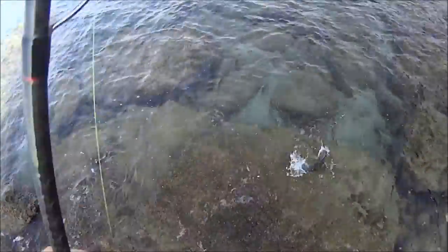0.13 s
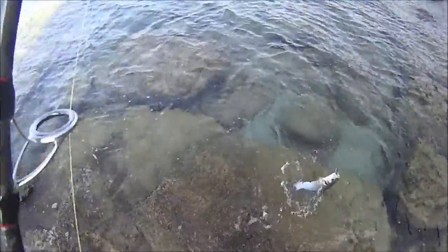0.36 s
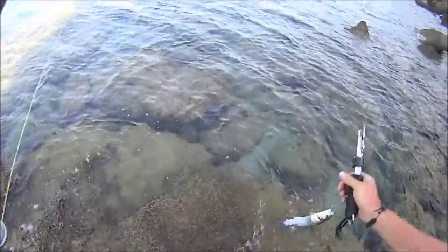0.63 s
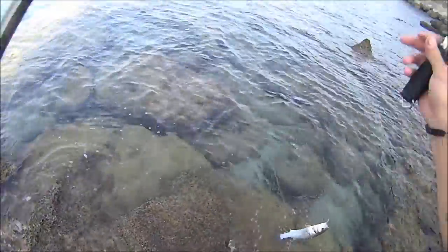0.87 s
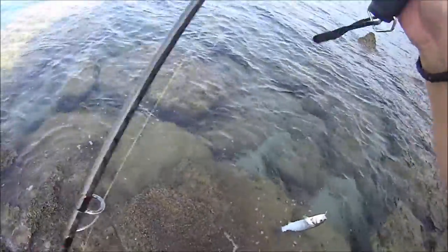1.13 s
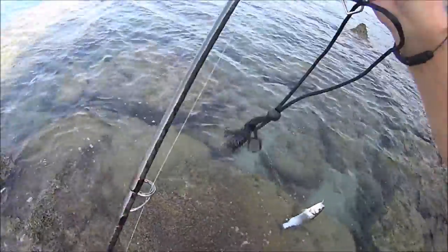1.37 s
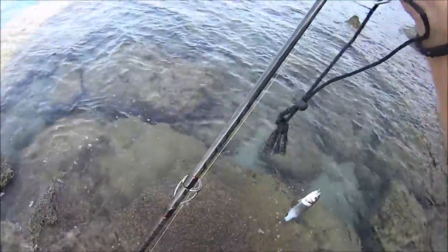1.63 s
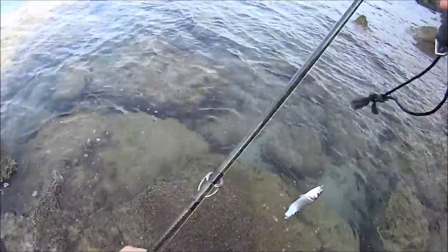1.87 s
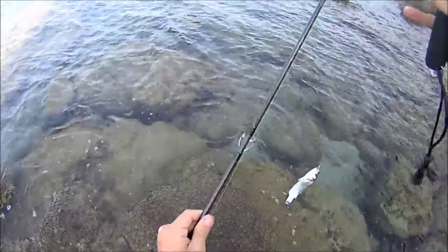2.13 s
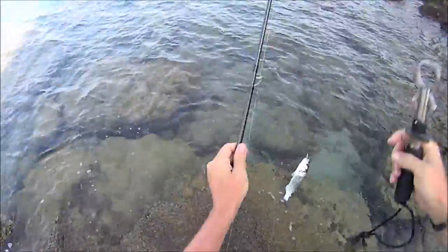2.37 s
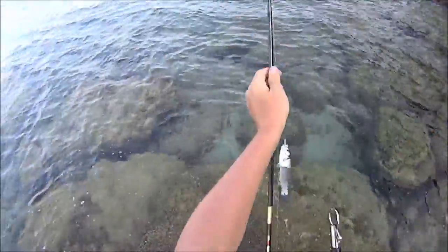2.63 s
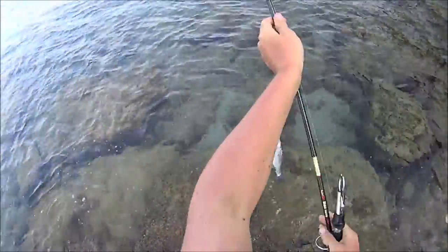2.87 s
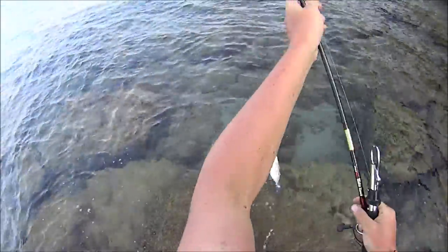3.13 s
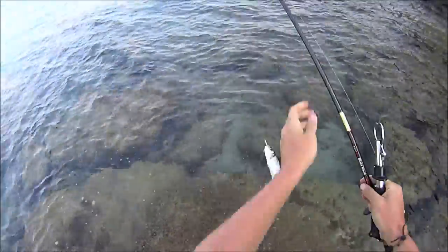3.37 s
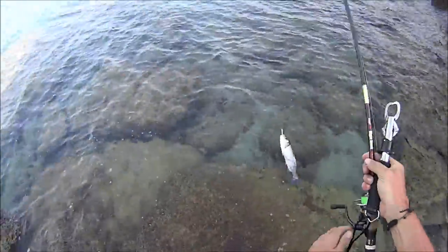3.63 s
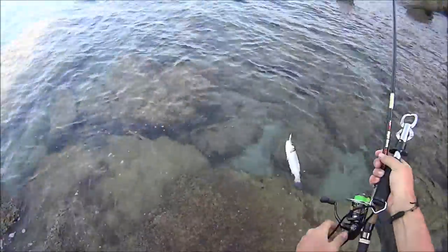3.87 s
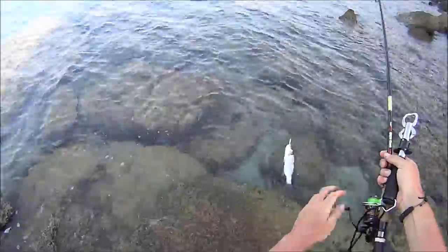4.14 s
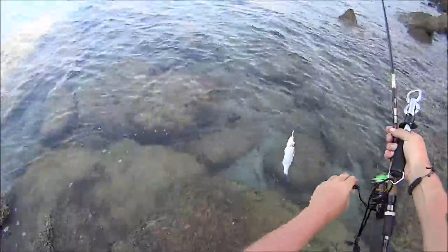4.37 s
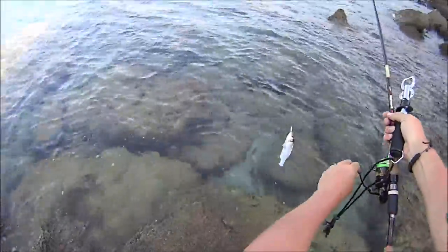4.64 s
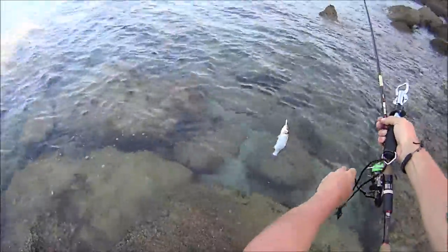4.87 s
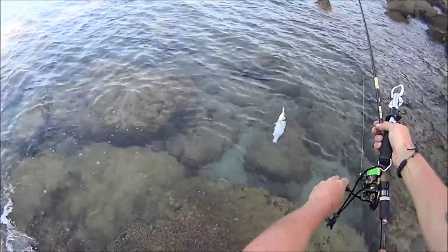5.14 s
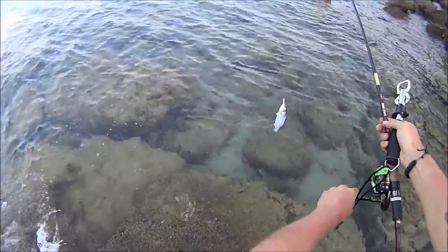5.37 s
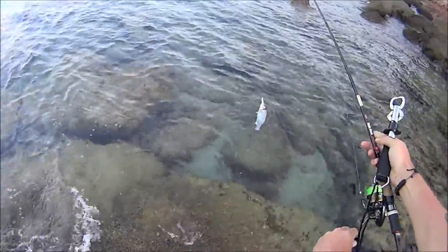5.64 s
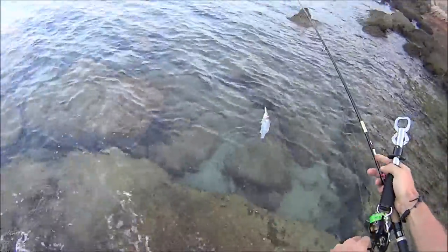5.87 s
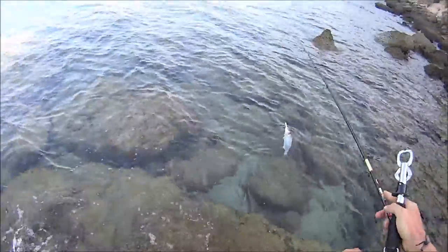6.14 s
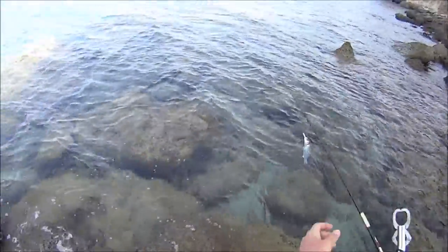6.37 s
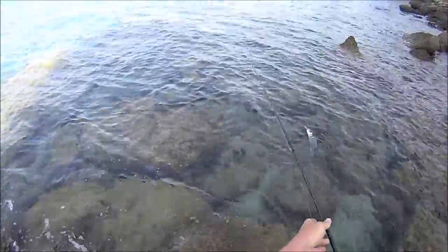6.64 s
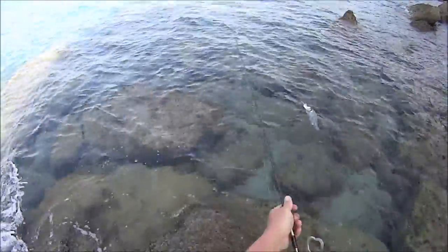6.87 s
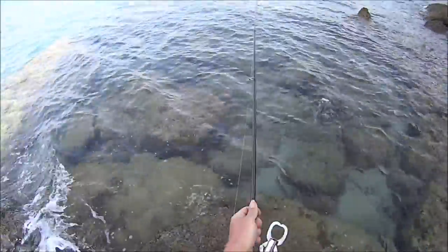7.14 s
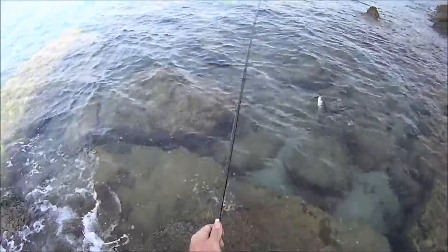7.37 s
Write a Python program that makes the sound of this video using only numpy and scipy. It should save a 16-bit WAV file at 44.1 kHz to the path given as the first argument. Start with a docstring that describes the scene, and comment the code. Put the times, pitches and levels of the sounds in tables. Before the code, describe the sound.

Small waves wash over shallow rocks close to a microphone inside a housing, giving the water a resonant, boxy colour. Quick splashes from a fish and sharp droplet ticks come first, then the water quiets. Later the foam swells with a cluster of slaps, eases, and rises to a broad splash near the end. A faint low breeze rumbles underneath.

```python
"""Small waves over shallow rocks

Close by, a foamy wash swells and ebbs: banded noise that follows a surge table, through a ringing housing.
Droplets tick and bubbles plink in it as short decaying tones; a fish and the waves throw short splashes,
sudden wide bursts of noise. Behind them a light breeze, low-passed noise, rumbles at the two microphone ports."""
import sys
import numpy as np
from scipy import signal
from scipy.fft import irfft
from scipy.io import wavfile
from scipy.ndimage import uniform_filter1d

SR = 44100
rng = np.random.default_rng(int(sys.argv[2]) if len(sys.argv) > 2 else 0)


def magnitude_from_level(level_db):
    """Linear magnitude for a level in decibels (20 dB per decade)."""
    exponent = np.asarray(level_db, float) / 20
    return 10 ** exponent


def pcm_store(signal):
    """Save signal as 16-bit PCM."""
    levels = np.round(np.clip(np.atleast_2d(signal), -1, 1) * 32767)
    wavfile.write(sys.argv[1], SR, levels.astype(np.int16).T)


N = 331191  # samples
PORT_DELAY = 256  # samples, delay built into the port responses and cut off after filtering
HOP = 64  # samples between frames of the wash

# swell and ebb of the water ahead of the housing: t/s, level/dB, treble/dB, bass/dB,
# band near 2.8 kHz/dB, band near 1.4 kHz/dB, left-right/dB
SURGE = [(0, -41.5, 0.5, 10.5, -2, 8, -0.5), (.21, -39.5, -1.5, 5.5, -7.5, 2, -1.5),
         (.65, -43.5, -0.5, 6, -2.5, 4.5, -1), (1.05, -40.5, -5.5, 6.5, -1.5, 1.5, -0.5),
         (1.57, -40.5, -0.5, 11, 3, 3.5, 0), (1.75, -41.5, -2.5, 9, 4.5, 6.5, -0.5),
         (1.96, -45, -4.5, 8.5, 2, 5.5, -0.5), (2.35, -45.5, -2.5, 8.5, -5, 5.5, -0.5),
         (2.7, -48.5, -2.5, 9.5, -3.5, 8, -0.5), (2.9, -45, -4, 8, 2.5, 3, -0.5),
         (3.15, -45.5, -2, 11, -7, 5, -0.5), (3.45, -39.5, -3.5, 5, -4, 3.5, -3),
         (3.75, -34.5, -4, 8.5, 1.5, -1.5, -0.5), (4.15, -38, -2, 7.5, 0, 3, .5),
         (4.6, -35.5, -5.5, 4, 0, -1.5, -1), (5.1, -33, -3, 8, -6.5, -7, 0),
         (5.4, -30.5, 0, 2.5, -1, -6, -0.5), (5.7, -33, -2.5, 7, -1.5, -2, -0.5),
         (6.07, -37.5, 0, 3.5, -1.5, 2, -0.5), (6.28, -38.5, -4, 5, -2, 6, -0.5),
         (6.6, -34, -0.5, 3.5, -0.5, -5, .5), (6.78, -36.5, -3, 6.5, -2, 2, -.5),
         (7, -31.5, -1.5, 3, -3, -5, -0.5), (7.25, -33, 0, 4, -3, 1, -1), (7.4, -35, 1, 7, -12, 4, -1.5),
         (7.51, -36, 0, 7, -1, 2, 0)]


def wash(patchy_db, flicker_db):
    """Foam and sliding water: noise in drifting patches, with slaps as sudden wide bursts."""
    # left-right likeness of the wash: f/Hz, likeness/1
    likeness = [(70, 0.91), (200, 0.59), (550, 0.42), (1090, 0.76), (1400, 0.95), (1900, 0.33),
                (2300, 0.88), (4600, 0.81), (6700, 0.74), (11000, 0.51)]
    wander_s, hollow_wander_db, treble_wander_db = 0.043, 2, 2  # averaging time, rms swings
    frames, hz = N // HOP + 5, np.fft.rfftfreq(256, 1 / SR)
    left_re, left_im, other_re, other_im, patches = rng.standard_normal((frames, 129, 5)).T
    patches = uniform_filter1d(uniform_filter1d(patches, 4, axis=0), 24, axis=1)
    patches = evened(patches)
    flicker = wander(frames, 12)
    t = np.arange(frames) * HOP / SR
    octaves = np.log2((hz[:, None] + 50) / 3500)

    s, *columns = np.transpose(SURGE)
    level_db, treble_db, bass_db, ring_db, hollow_db, pan_db = (np.interp(t, s, c) for c in columns)
    steps = wander_s * SR / HOP
    hollow_db = hollow_db + hollow_wander_db * wander(frames, steps)
    treble_db = treble_db + treble_wander_db * wander(frames, steps)
    shape_db = treble_db * np.clip(octaves - 0.3, 0, 1)
    shape_db += bass_db * np.clip(-0.9 * octaves - 1.3, 0, 1)
    shape_db += hollow_db * np.exp(-((octaves + 1.3) / 0.28) ** 2)
    shape_db += ring_db * np.exp(-((octaves + 0.3) / 0.22) ** 2)
    moving_db = patchy_db * patches + flicker_db * flicker * (octaves > -1)
    power = magnitude_from_level(2 * (level_db + shape_db + moving_db)) + slap_power(t, octaves)

    # the right port hears a frequency-dependent share of the left port's noise
    same = np.clip(read(likeness, hz), -1, 1)[:, None]
    left = left_re + 1j * left_im
    right = same * left + np.sqrt(1 - same ** 2) * (other_re + 1j * other_im)
    unit = np.std(signal.istft(left, nperseg=256, noverlap=192)[1])
    spectra = np.array([left, right]) * np.sqrt(power) * panned(pan_db)[:, None]
    return signal.istft(spectra, nperseg=256, noverlap=192)[1][:, :N] / unit


def slap_power(t, octaves):
    """Splashes of the fish and waves: power over band and time, a fast rise and exponential decay."""
    # slaps of water: t/s, level/dB, rise/s, decay t60/s, brightness/(dB per octave)
    slaps = [(.1, -29, .006, 0.1, 7), (.19, -38, .002, .12, 5), (0.364, -25, 0.0097, 0.11, 0),
             (.397, -41, 0.0022, 0.027, 1), (.72, -39, .003, .04, 3), (.54, -48, 0.011, 0.082, -4),
             (1.14, -28.5, .008, 0.07, 2), (1.28, -26.5, 0.0094, 0.11, -3), (1.39, -33, 0.0056, 0.12, 0),
             (1.5, -20.5, 0.015, 0.12, -3), (2.14, -34, 0.033, 0.3, -1), (2.771, -22.5, 0.0034, 0.042, 0),
             (2.828, -38.5, 0.002, 0.16, -3.5), (2.948, -26.5, 0.0043, 0.031, 0),
             (3.27, -40, 0.011, 0.17, -4.5), (3.66, -34, 0.033, 0.53, -5.5), (4.73, -39, 0.012, 0.14, -9),
             (4.937, -29, 0.0055, 0.27, 0), (5.15, -23.5, 0.012, 0.18, 2.5), (5.31, -26, 0.011, 0.11, 2),
             (5.44, -21.5, .01, 0.11, -3), (5.569, -16.5, 0.0063, 0.049, -1.5),
             (5.73, -20.5, 0.0078, .08, -1), (5.83, -33, .01, 0.075, 11), (6.11, -37, .01, 0.13, 10),
             (6.24, -29, .01, .06, -3.5), (6.598, -34.5, 0.015, 0.055, -10.5),
             (6.63, -25.5, .01, 0.088, 0.5), (6.839, -26, 0.011, 0.087, -6), (6.92, -26, .01, 0.11, 0),
             (7.27, -13.5, 0.052, 0.29, 0)]
    lumps_db = 1.8 * wander(len(t), 3)  # a slap breaks into spatters
    power = np.zeros((len(octaves), len(t)))
    for at, db, rise, t60, tilt_db in slaps:
        age = np.maximum(t - at, 0)
        slap_db = db + lumps_db + tilt_db * np.maximum(octaves, -3.5) - 60 * age / t60
        power += magnitude_from_level(2 * slap_db) * (1 - np.exp(-age / rise)) ** 2
    return power


def spray(per_s, spread_db, db, low_hz, high_hz, cycles, count):
    """Many droplets or bubbles: rising, decaying tones of mixed pitch that follow the surge; a few stand out."""
    clump_db, clump_s = 1.5, 0.03  # droplets come in clumps: rms swing, averaging time
    s, level_db = np.transpose(SURGE)[:2]
    size = magnitude_from_level(spread_db * np.minimum(rng.exponential(1, N), 4))
    size = size * (rng.random(N) < per_s / SR)
    kind, out = rng.integers(0, count, N), np.zeros((2, N))
    for k, hz in enumerate(np.geomspace(low_hz, high_hz, count)):
        ring = cycles * rng.uniform(0.75, 2.56)  # cycles to fall by a factor e
        turns = hz * np.arange(round(7 * ring / hz * SR)) / SR
        grain = np.sin(2 * np.pi * turns * (1 + 0.0497 * turns / ring)) * np.exp(-turns / ring)
        grain /= np.linalg.norm(grain)
        out += panned(rng.normal(0, 2.0))[:, None] * signal.oaconvolve(size * (kind == k), grain)[:N]
    clumps_db = clump_db * wander(N, clump_s * SR)
    surge_db = np.interp(np.arange(N) / SR, s, level_db)
    return magnitude_from_level(db + clumps_db + surge_db) * evened(out)


def near_ticks(response):
    """Droplets close to the ports: a short tone with spatter around its pitch, ringing the housing."""
    # the clearest droplet ticks: t/s, peak/dB, centre f/Hz, left-right/dB
    ticks = [(0.079, -22, 2800, -5), (.0845, -23, 2800, -5), (0.1056, -17, 2780, -5), (0.12, -19, 2860, -5),
             (0.128, -19.5, 5300, -1), (0.3823, -19, 7900, -6), (0.3984, -13.5, 3760, -3),
             (0.4713, -28, 4200, -3), (.5006, -25.5, 10500, -5), (0.5574, -17.5, 7900, -4),
             (.5696, -25, 7100, -3), (0.6527, -26.5, 2700, -2), (.7148, -27, 10300, -2),
             (0.7225, -21.5, 2670, -4), (.8511, -25.5, 2600, -1), (.9832, -30, 5200, -1),
             (1.1521, -24, 6160, -1), (1.162, -20.5, 2800, 3), (1.1976, -23.5, 5800, -1),
             (1.233, -30, 6600, 0), (1.2904, -22, 3000, 3), (1.397, -27, 3600, 2), (1.404, -25, 3200, 2),
             (1.4432, -28, 5300, -1), (1.521, -19, 2800, 1), (1.542, -23.5, 6350, 3),
             (1.6485, -23, 8640, -3), (1.6762, -23.5, 2820, 1), (1.7203, -21.5, 5250, -2),
             (1.7603, -24, 3180, 1), (1.8925, -33, 2800, 2), (1.9003, -28, 2900, 0), (1.9075, -29, 6600, 4),
             (2.45, -26, 8260, 2), (2.6675, -32, 6500, -3), (2.7737, -18, 5300, 0), (2.78, -21, 4200, 0),
             (2.7866, -28, 4330, 0), (2.7914, -24, 3000, 2), (2.829, -29, 4230, -3),
             (2.8317, -31, 9100, -2), (2.844, -28, 5000, -3), (2.865, -29, 8000, -2),
             (2.8783, -25, 4200, 0), (2.9071, -19.5, 3670, -3), (2.9148, -25, 6900, -3),
             (2.95, -28, 5570, -3), (2.9535, -23, 5200, -3), (2.9607, -32, 4000, 0),
             (2.9774, -31, 5700, -2), (3.031, -34, 8250, -7), (3.195, -28.5, 5300, -3),
             (3.473, -28, 10400, -3), (3.6282, -23, 6800, 1), (3.75, -26, 2800, 7), (4.393, -20.5, 4640, 8),
             (4.4734, -23, 6800, -1), (4.4796, -23, 2800, -1), (4.502, -17, 6450, -1),
             (4.883, -19, 5870, -3), (4.939, -17, 6960, 1), (5.0346, -20.5, 6600, -2),
             (5.1076, -26, 5440, -1), (4.554, -30, 5450, -1), (4.7416, -22, 3360, -10),
             (5.467, -9.5, 3300, 3), (5.6174, -16.5, 5170, 0), (5.626, -21, 8650, 0),
             (5.832, -21, 5800, -2), (5.9, -26, 5770, -1), (6.134, -21, 4200, -1), (6.3451, -22, 7300, -3),
             (6.5388, -20, 3160, -2), (6.581, -22.5, 8340, 10), (6.643, -18, 5300, 2),
             (6.736, -22, 5300, -2), (6.8556, -17, 3330, 0), (6.9345, -12, 2680, 3),
             (6.9773, -17.5, 5850, -3), (6.993, -20, 5730, -2), (7.1223, -19, 5300, -1),
             (7.2112, -17, 4500, -1), (7.274, -10, 5100, 1.5), (7.277, -16, 4520, 0),
             (7.4734, -18, 5700, 0)]
    tick_t60_s, spatter_t60_s, rise_s = 0.0061, 0.024, 0.00034
    spatter_width = 0.44  # bandwidth as a share of the pitch
    out, t = np.zeros((2, N)), np.arange(1500) / SR
    for s, peak_db, hz, pan_db in ticks:
        r = np.exp(-np.pi * spatter_width * hz / SR)
        resonator = [1, -2 * r * np.cos(2 * np.pi * hz / SR), r * r]
        spatter = evened(signal.lfilter([1, 0, -1], resonator, rng.standard_normal(len(t))))
        tick = np.sin(2 * np.pi * hz * t) + 0.69 * spatter
        tick *= magnitude_from_level(-60 * t / tick_t60_s) * np.minimum(t / rise_s, 1)
        tick[:2] += 0.29 * np.array([1, -1])  # the sharp first contact
        tick += 0.18 * spatter * magnitude_from_level(-60 * t / spatter_t60_s)  # fine spatter after it
        add_near(out, s, peak_db, pan_db, tick, response)
    return out


def large_bubbles(response):
    """Bubbles: decaying tones whose pitch rises as each nears the surface, ringing the housing."""
    # large bubbles: t/s, peak/dB, starting f/Hz, decay t60/s
    bubbles = [(.105, -43.5, 437, 0.024), (0.239, -48, 93, 0.066), (0.269, -51.5, 160, 0.17),
               (.412, -46, 880, 0.044), (2.35, -53, 160, 0.15), (2.764, -31.5, 1320, 0.024),
               (3.081, -35, 2230, 0.037), (3.09, -51, 288, 0.082), (3.21, -47.5, 275, 0.15),
               (3.34, -48.5, 246, 0.1), (3.46, -40, 2150, 0.13), (3.668, -42, 473, 0.092),
               (5.315, -46, 332, 0.078), (6.306, -48, 189, 0.025), (6.844, -28, 1400, 0.036)]
    out, t = np.zeros((2, N)), np.arange(4000) / SR
    for s, peak_db, hz, t60 in bubbles:
        tone = np.sin(2 * np.pi * hz * t * (1 + 0.038 * t / t60))
        tone *= magnitude_from_level(-60 * t / t60) * np.minimum(t * hz / 3.5, 1)  # fades in over 3.5 cycles
        add_near(out, s, peak_db, 0, tone, response)
    return out


def add_near(mix, s, peak_db, pan_db, sound, response):
    """Sends a near sound through the ports, sets the peak of their mean, pans it and mixes it in at s."""
    heard = signal.fftconvolve(sound[None], response, axes=1)[:, PORT_DELAY:]
    heard = magnitude_from_level(peak_db) * panned(pan_db)[:, None] * heard / abs(heard.mean(0)).max()
    part = mix[:, round(s * SR):][:, :heard.shape[1]]
    part += heard[:, :part.shape[1]]


def ports():
    """Impulse responses of both ports: causal housing colour, mean-port rms gain set over 2.2-6 kHz."""
    # colour of the water before the housing: f/Hz, level/dB
    water_colour = [(30, -28), (100, -34), (170, -22.5), (300, -20), (800, -17), (2000, -13), (4000, -6.5),
                    (6500, -9.5), (9000, -12.5), (11000, -13)]
    # housing resonances: f/Hz, width/Hz, left/dB, right/dB
    housing = [(962, 188, 5.5, 7.5), (1246, 227, 5.5, 10.5), (1330, 85, 8.5, 8), (1610, 150, 2, 3),
               (2400, 96, -6.5, 0.5), (2800, 840, 16, 8.5), (3300, 590, 1.5, 3), (5300, 930, 4.5, 3.5),
               (6270, 280, 0.5, 3), (7900, 1430, 5.5, 2), (10060, 1230, -5.5, -6)]
    # balance of the ports: f/Hz, left-right/dB
    lean = [(60, -2), (500, -1.5), (1500, -4.5), (2500, -3.5), (11000, 1)]
    # phase by which the left port leads: f/Hz, lead/rad
    lead = [(60, 0.21), (200, -0.64), (630, -1.12), (900, -0.92), (1600, -1.42), (2250, -0.81),
            (2750, -0.64), (4000, -0.44), (6700, 0.74), (11000, 0.25)]
    hz = abs(np.fft.fftfreq(8192, 1 / SR))
    db = read(water_colour, hz) + np.outer([0.5, -0.5], read(lean, hz))
    for f, width, left_db, right_db in housing:
        db = db + np.outer([left_db, right_db], 1 / (1 + (2 * (hz - f) / width) ** 2))
    # minimum phase of the mean colour, plus the delay
    phase = -signal.hilbert(np.log(magnitude_from_level(db.mean(0)))).imag - hz * 2 * np.pi * PORT_DELAY / SR
    gain = magnitude_from_level(db) * np.exp(1j * (phase + np.outer([0.5, -0.5], read(lead, hz))))
    band = (hz > 2200) & (hz < 6000)
    # the mean runs over all bins, so the in-band power counts by its share of the spectrum
    band_gain = np.sqrt(np.mean(band * abs(gain.mean(0)) ** 2))
    return irfft(gain[:, :4097])[:, :3000] / band_gain


def breeze():
    """Air over the ports: low-passed noise, mostly shared by both, with slow gusts."""
    # strength of the breeze: t/s, level/dB
    strength = [(0, -56), (.25, -57), (.4, -66.5), (1.05, -63), (1.3, -65), (2.2, -66), (2.35, -64),
                (2.8, -64), (3.1, -69.5), (3.7, -66.5), (4.3, -64.5), (4.75, -63), (5.2, -71), (5.9, -65.5),
                (6.1, -59), (6.6, -58.5), (6.9, -63.5), (7.51, -63)]
    gusts_db, gust_s = 1, 0.12  # rms swing, averaging time
    shared, *own = rng.standard_normal((3, N))
    low = shared + 0.45 * np.array(own)
    low = signal.sosfilt(signal.butter(1, 70, fs=SR, output="sos"), low)
    low = signal.sosfilt(signal.butter(2, 105, fs=SR, output="sos"), low)
    s, db = np.transpose(strength)
    level_db = np.interp(np.arange(N) / SR, s, db) + gusts_db * wander(N, gust_s * SR)
    return magnitude_from_level(level_db) * evened(low)


def evened(x):
    """Scales to rms 1."""
    return x / np.sqrt(np.mean(x ** 2) + 1e-20)


def wander(size, steps):
    """Slow random drift of rms 1: noise averaged over a number of steps."""
    return evened(uniform_filter1d(rng.standard_normal(size), max(round(steps), 1)))


def read(points, hz):
    """Reads a spectrum table on a log-frequency axis."""
    f, value = np.transpose(points)
    return np.interp(np.log(hz + 1), np.log(f + 1), value)


def panned(db):
    """Left and right gains for a left-right difference in dB."""
    return magnitude_from_level(np.array([db / 2, -db / 2]))


def scene():
    """Water through the housing, plus near drops and bubbles and the breeze."""
    response = ports()
    water = wash(patchy_db=1.0, flicker_db=1.57)
    # fine spray, gurgles, then scattered drops
    water += spray(per_s=1800, spread_db=4.0, db=-8.5, low_hz=1097.7, high_hz=10600, cycles=4.9, count=32)
    water += spray(per_s=80, spread_db=4.2, db=-19.5, low_hz=160, high_hz=761, cycles=3.86, count=16)
    water += spray(per_s=50, spread_db=2.5, db=-16, low_hz=3490, high_hz=8700, cycles=3.7, count=12)
    heard = signal.oaconvolve(water, response, axes=1)[:, PORT_DELAY:N + PORT_DELAY]
    return heard + near_ticks(response) + large_bubbles(response) + breeze()


def top_cut(x):
    """Nothing passes above the cut-off."""
    return signal.sosfilt(signal.butter(12, 12320, fs=SR, output="sos"), x)


def record(dry):
    """Limits the band with a steep low-pass at 10990 Hz and finishes the mix."""
    low_pass = signal.firwin(401, 10990, window=("kaiser", 9), fs=SR)
    limited = signal.oaconvolve(dry, low_pass[None], "same")
    return top_cut(limited)


dry = scene()
out = record(dry)
pcm_store(out)
```